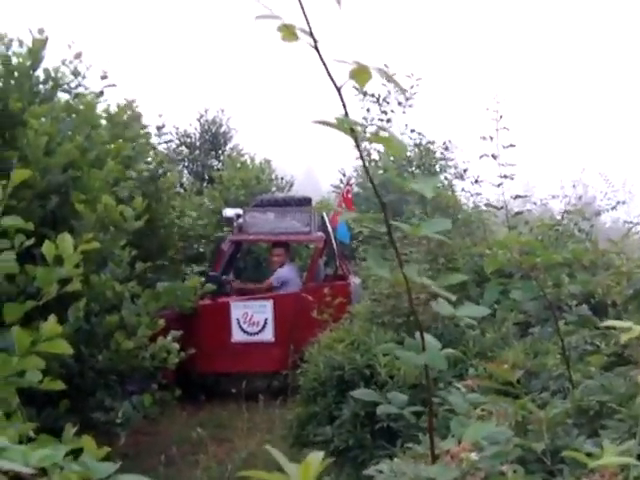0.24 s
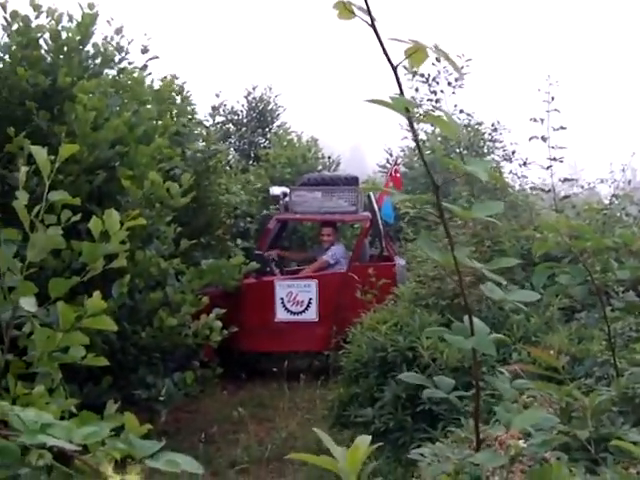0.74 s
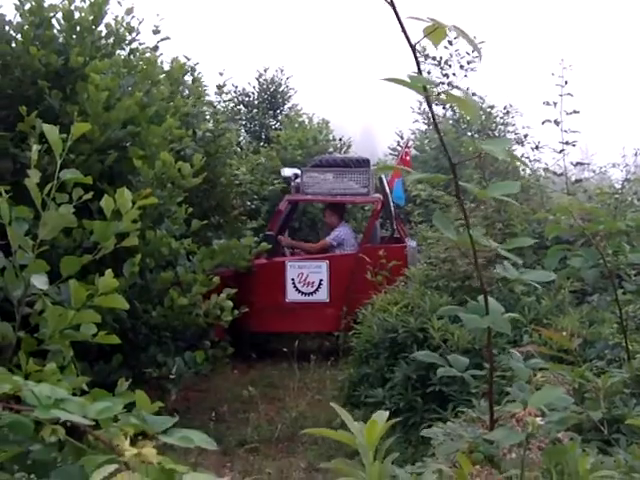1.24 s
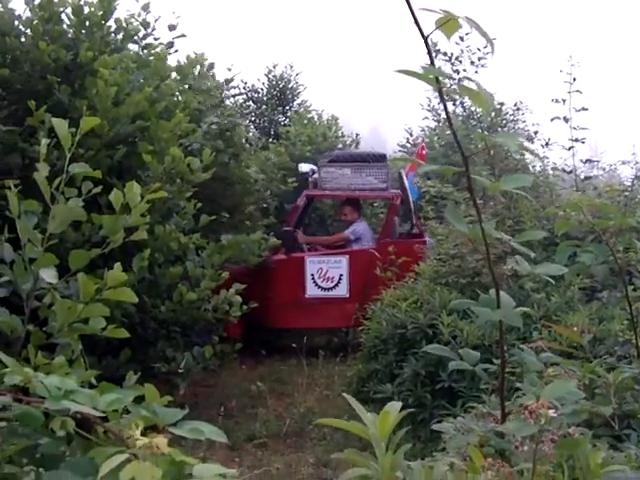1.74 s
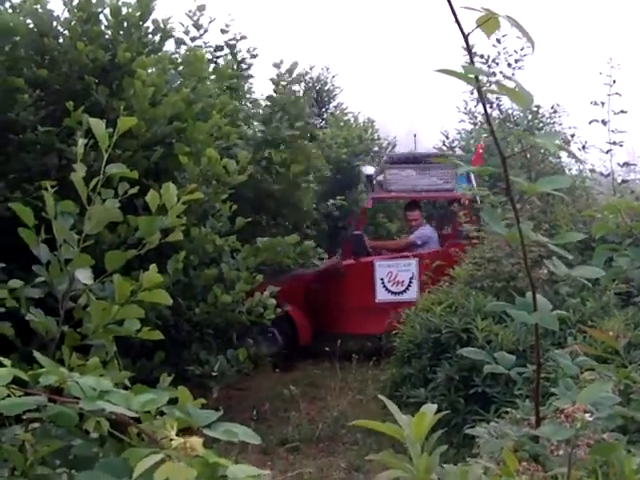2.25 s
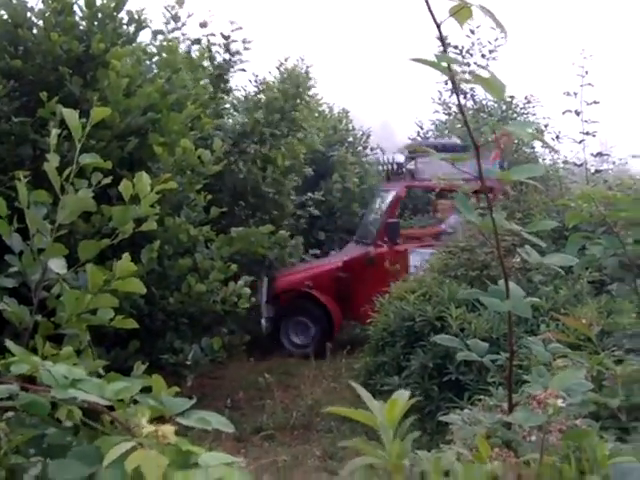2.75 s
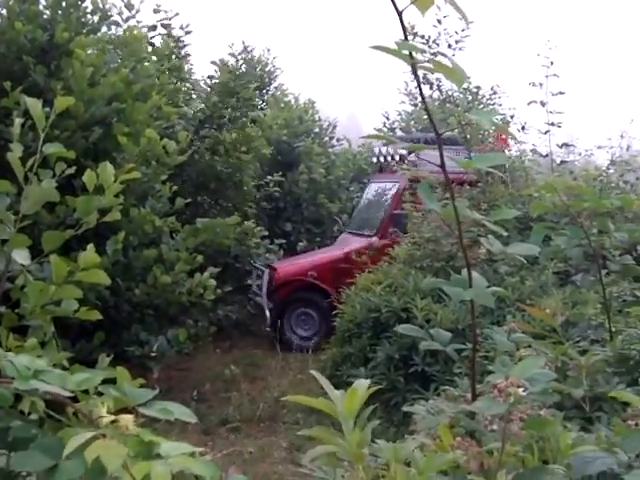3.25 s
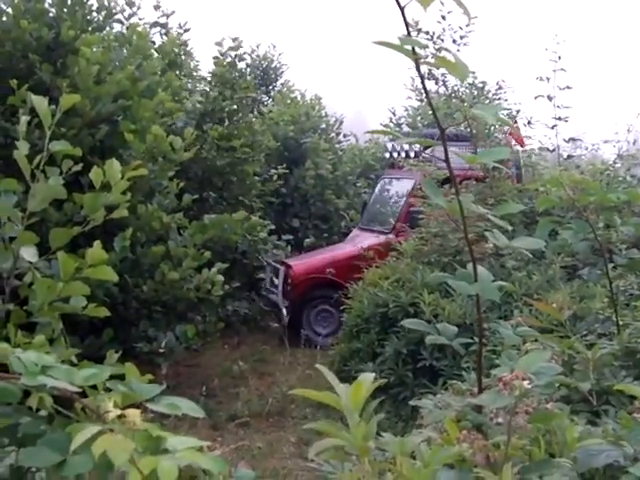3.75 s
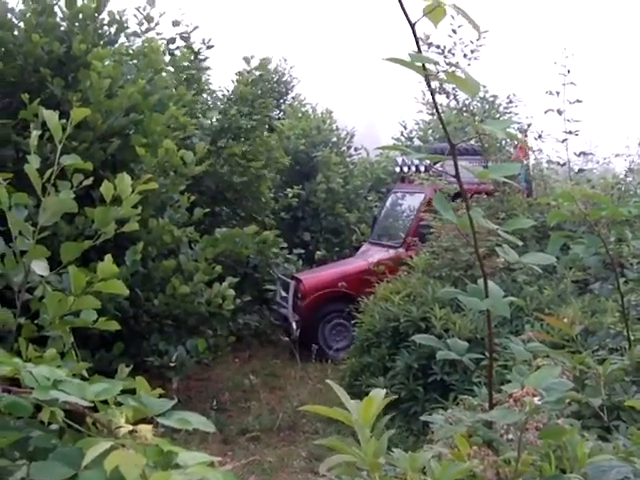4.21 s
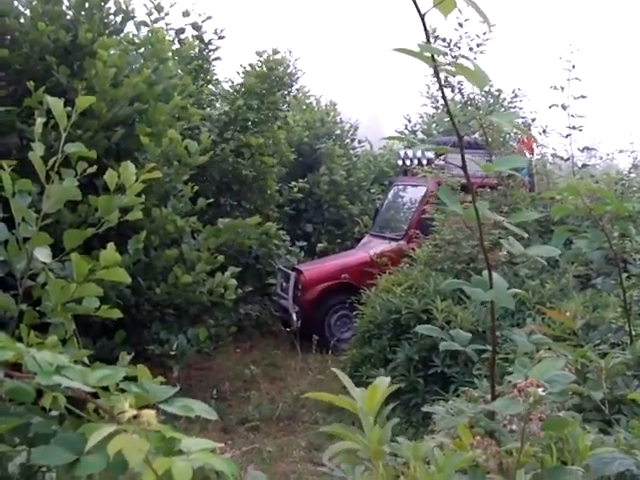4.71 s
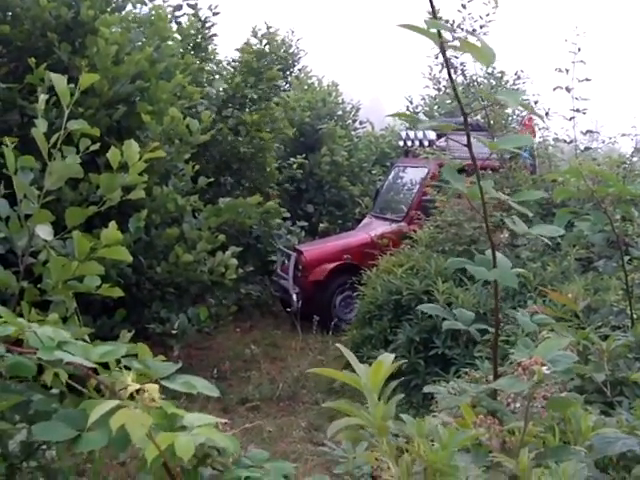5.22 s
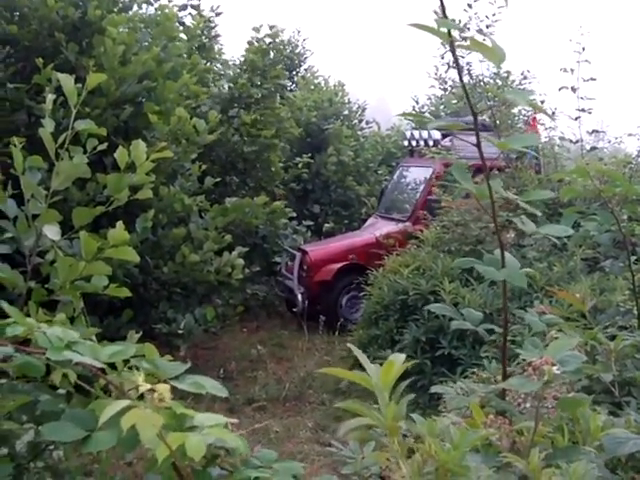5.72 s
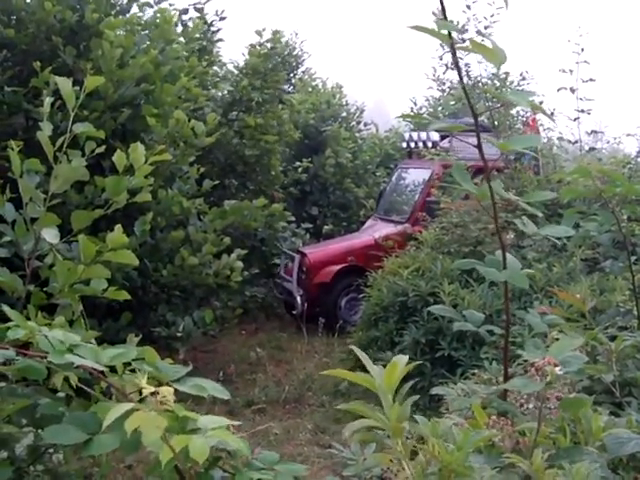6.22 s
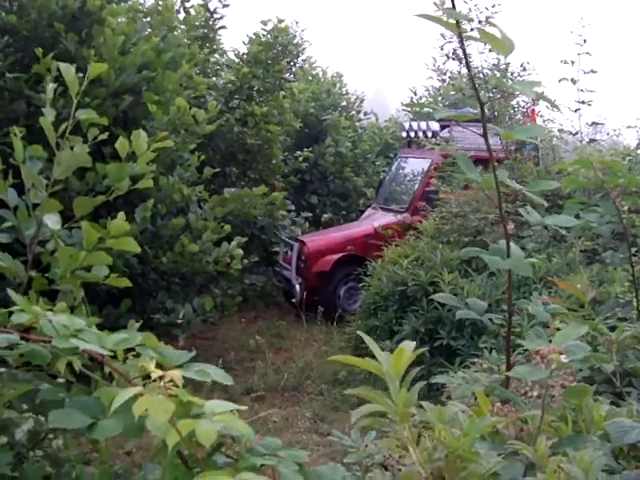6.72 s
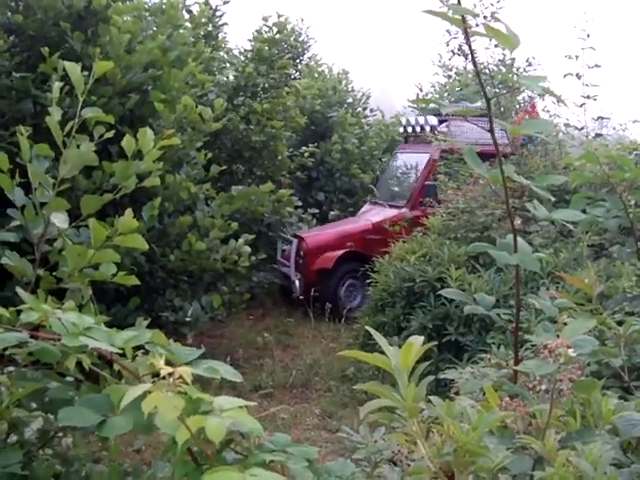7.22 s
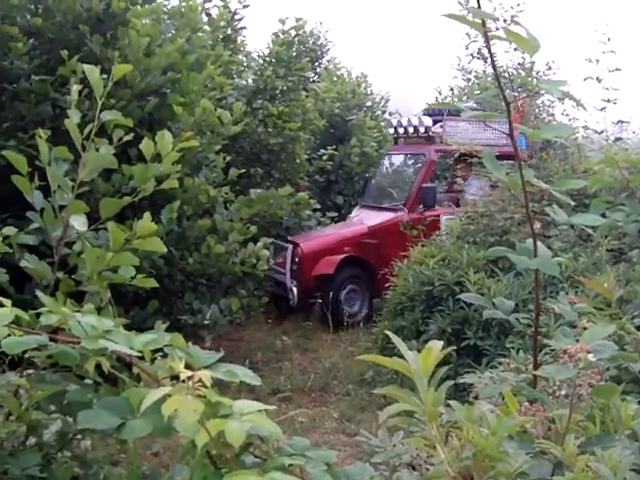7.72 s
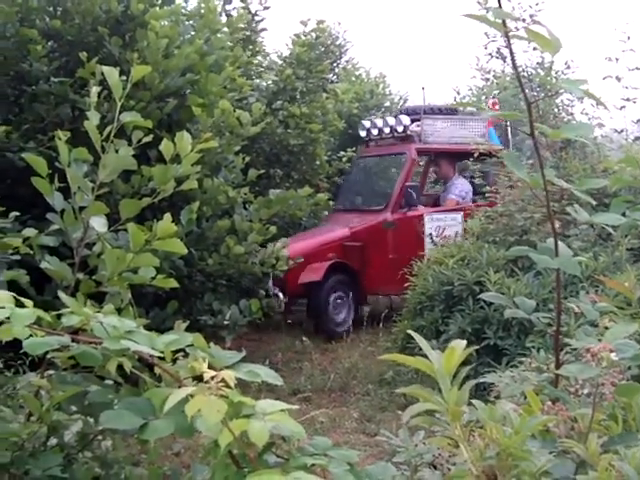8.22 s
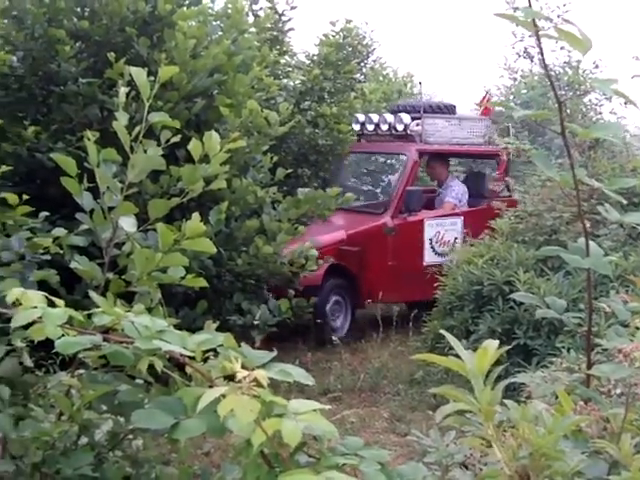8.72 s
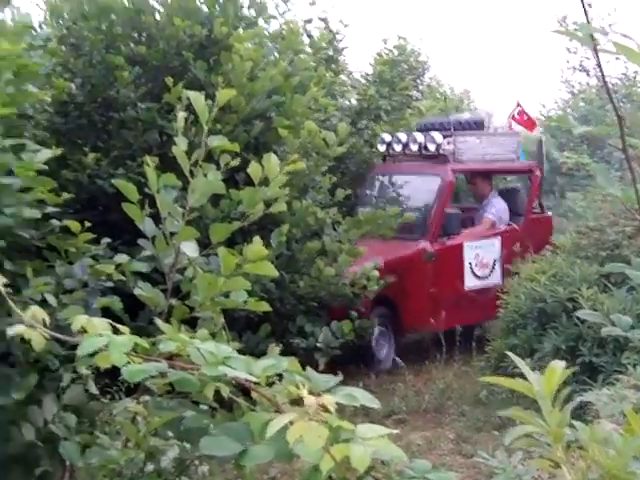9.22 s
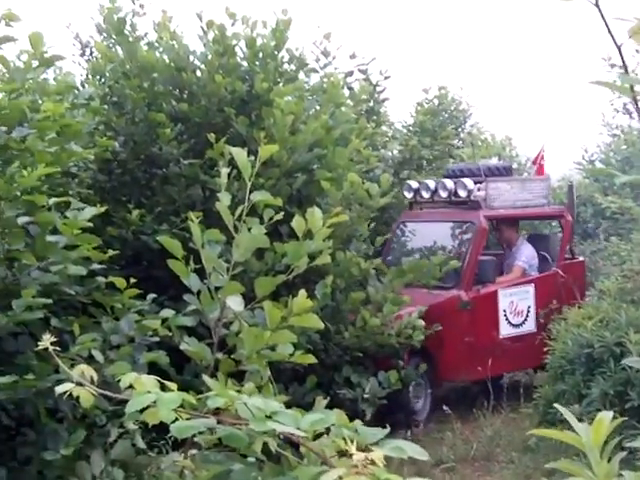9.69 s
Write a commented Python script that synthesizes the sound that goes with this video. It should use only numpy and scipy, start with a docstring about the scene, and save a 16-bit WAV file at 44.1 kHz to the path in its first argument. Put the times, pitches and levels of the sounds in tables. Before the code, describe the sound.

A small slow engine knocks and chuffs, revs hard in two bursts with a quiet idle between, as a car pushes through leafy brush.

```python
"""A small slow engine knocks and chuffs as it pushes a light car through dense brush, heard from a few metres.
Every cycle the cylinder knocks and, soon after, the exhaust spits a chuff of gas: soft and rounded at idle,
sudden and hissing under load. Knocks are short ringing tones and noise; chuffs are noise, shaped and resonated.
Valve gear clatters between (noise and clicks through the casing), leaves brush the body (coloured noise),
twigs snap (noise bursts), and loose parts ring when struck (dying tones)."""
import sys
import numpy as np
from scipy import signal
from scipy.fft import rfft, irfft, next_fast_len
from scipy.io import wavfile

SR = 44100
rng = np.random.default_rng(int(sys.argv[2]) if len(sys.argv) > 2 else 0)


def unload_audio(sound):
    """Save the sound as a 16-bit wav file, at the path given as the first command line argument."""
    columns = np.transpose(np.atleast_2d(sound))
    # keep every value between -1 and 1, then stretch to whole-number steps
    steps = np.round(np.clip(columns, -1, 1) * 32767)
    wavfile.write(sys.argv[1], SR, steps.astype(np.int16))


def boost(x):
    """Linear amplitude factor 10**(x/20) for a level x in decibels (scalar or array-like)."""
    u = np.asarray(x, float) / 20
    return 10 ** u


N = 438794

# The engine casing's resonances. Each row: pitch in Hz, width in Hz, level in dB.
CASING = [(1432, 150, 2), (1843, 220, -2), (2140, 300, -2), (2480, 520, -1.5), (3250, 330, -5),
          (4210, 1040, -9)]


def noise():
    """White noise."""
    return rng.standard_normal(N)


def rms_one(x):
    """Scale to unit rms."""
    return x / np.sqrt(np.mean(x ** 2) + 1e-20)


def grains(per_s, spread_db):
    """Random clicks of uneven size and sign; rms 1."""
    sizes = boost(spread_db * np.minimum(rng.exponential(1, N), 5))
    signs = rng.choice([-1, 1], N)
    return rms_one(sizes * signs * (rng.random(N) < per_s / SR))


def flicker(rate, depth_db):
    """Gain that wanders at random, with a new target rate times a second (19 at most)."""
    knots = rng.standard_normal(200)
    position = np.arange(N) * min(rate, 19) / SR
    return boost(depth_db * np.interp(position, np.arange(len(knots)), knots))


def dull(x, hz):
    """Take away the treble: second-order low-pass."""
    return signal.sosfilt(signal.butter(2, hz, fs=SR, output="sos"), x)


def coloured(x, spectrum):
    """Shape a steady sound by a spectrum of (Hz, dB) points; rms 1."""
    hz, db = np.transpose(spectrum)
    size = next_fast_len(N)
    log_hz = np.log(np.arange(size // 2 + 1) * SR / size + 1)
    gain = boost(np.interp(log_hz, np.log(hz), db))
    return rms_one(irfft(rfft(x, size) * gain, size)[:N])


def resonate(x, modes):
    """Parallel resonances of alternating sign, scaled to keep the power of white noise."""
    out, power = 0, 0
    for k, (hz, width, db) in enumerate(modes):
        r = np.exp(-np.pi * width / SR)
        top = (-1) ** k * boost(db) * (1 - r * r) / 2
        feedback = [1, -2 * r * np.cos(2 * np.pi * hz / SR), r * r]
        out = out + signal.lfilter([top, 0, -top], feedback, x + 1e-18)
        power += boost(2 * db) * np.pi * width / SR
    return out / np.sqrt(power)


def bursts(times, levels_db, rise_ms, hold_ms, fall_ms):
    """Envelope of bursts: exponential rise up to the given moment, a hold, an exponential fall."""
    margin = 2000  # samples kept ahead of the start, for the rise
    out, ms = np.zeros(N + 10000), np.arange(-margin, 6000) * 1000 / SR
    for s, db, rise, hold, fall in np.broadcast(times, levels_db, rise_ms, hold_ms, fall_ms):
        rising = np.minimum(ms, 0) / max(rise, .2)
        falling = np.maximum(ms - hold, 0) / max(fall, 1)
        at = round(s * SR)
        # overlapping bursts add as power
        out[at:at + len(ms)] += (boost(db) * np.exp(rising - falling)) ** 2
    return np.sqrt(out[margin:N + margin])


def ring(times, levels_db, hz, t60):
    """Clicks set one sine ringing, which dies by 60 dB in t60 seconds."""
    clicks = np.zeros(N)
    clicks[np.minimum(np.round(np.multiply(times, SR)).astype(int), N - 1)] = boost(levels_db)
    r, w = boost(-60 / (t60 * SR)), 2 * np.pi * hz / SR
    return signal.lfilter([0, np.sin(w)], [1, -2 * r * np.cos(w), r * r], clicks + 1e-18)


def strokes():
    """The crank plays a light stroke every cycle; full firings replace strokes, hard knocks only their knocks."""
    # Engine speed. Each row: time in seconds, working cycles per minute.
    speed = [(0.0, 564.4), (0.583, 499.9), (1.022, 676.2), (1.427, 808.6), (2.237, 543.2), (2.536, 648.9),
             (3.455, 515.3), (3.792, 526.4), (3.981, 478.5), (4.864, 468.8), (6.213, 479.3), (6.508, 452.4),
             (6.918, 695.0), (7.306, 631.7), (8.359, 699.2), (8.709, 603.5), (9.094, 635.7), (9.95, 505.1)]
    # Typical light strokes over time. Each row: time in seconds, jet level in dB, pipe level in dB,
    # rise of the jet in ms, knock level in dB.
    light = [(0.0, -28, -19.5, 3, -28.5), (0.5, -27.5, -22, 4.9, -28), (1.6, -26, -19.5, 5.5, -27),
             (2.6, -28.5, -20, 6.3, -31), (3.2, -27.5, -21, 4.3, -37), (3.6, -31.5, -23, 13, -29),
             (3.95, -31, -19.5, 5.8, -33), (4.9, -33, -21, 6.8, -30.5), (5.3, -30.5, -20.5, 7.5, -29),
             (6.5, -32.5, -22.5, 5.5, -31.5), (7.9, -26, -18, 9.6, -19.5), (8.25, -26.5, -25.5, 26, -31),
             (8.42, -25, -19, 2.5, -24.5), (8.9, -27, -19.5, 12.4, -33), (9.25, -25, -19, 5.3, -31),
             (9.95, -26.5, -18, 5.4, -40)]
    # Full firings. Each row: knock in seconds, knock level in dB, ms until the exhaust crest,
    # jet level in dB, pipe level in dB.
    firings = [(0.7348, -10.5, 26.7, -15, -19), (0.8373, -16, 24.2, -15, -19),
               (1.0222, -14.5, 22.6, -14.5, -17.5), (1.1944, -10.5, 21.2, -14.5, -23),
               (1.276, -12, 19.2, -16.0, -21), (1.3535, -12.5, 18.7, -18.0, -18.5),
               (1.4306, -11.0, 19.6, -15.0, -19.0), (1.5061, -13.5, 17.5, -16, -17),
               (1.744, -13.5, 21.5, -21.5, -17.5), (1.8333, -13, 22.2, -19.5, -17),
               (1.9223, -15.5, 22, -24.0, -19.5), (2.0201, -14, 23.3, -18.5, -17),
               (2.1164, -20, 29.5, -28, -18.5), (2.2245, -15.0, 26.3, -16.5, -14.5),
               (2.3292, -18.5, 27.2, -16, -16), (2.4335, -17, 24.2, -17.0, -16.5),
               (6.5811, -18.0, 29.4, -19.5, -16.0), (6.691, -21.5, 25, -20.5, -16),
               (6.792, -21, 24.8, -18.5, -14), (6.887, -21, 21, -19, -15), (6.9764, -21, 20, -18, -14),
               (7.1548, -14, 22, -18, -16), (7.3411, -15, 23.5, -16, -16.5),
               (7.435, -20.5, 23.3, -19.5, -16.5), (7.5276, -23.5, 26.4, -31, -20.5),
               (7.6254, -19.5, 24.2, -17.5, -15.5), (7.7188, -20, 23.4, -18.5, -19),
               (7.81, -20.5, 22, -19.5, -19.5)]
    # Hard knocks. Each row: time in seconds, level in dB.
    hard_knocks = [(1.0941, -23), (2.529, -19.5), (8.71, -14.5), (8.8906, -21.5), (8.988, -20),
                   (9.085, -17.5), (9.921, -20.5)]

    t = np.arange(N + SR // 10) / SR
    turn = np.interp(t, *np.transpose(speed)) / 60  # cycles per second
    # the exhaust crests at whole cycles; the sound starts at cycle -0.9315
    crest = np.interp(np.arange(96), -0.9315 + np.cumsum(turn) / SR, t)
    # a light stroke knocks 0.43 cycles before its exhaust crest
    knock_s = crest - 0.43 / np.interp(crest, t, turn)
    s, *controls = np.transpose(light)
    jet_db, pipe_db, rise, knock_db = [np.interp(crest, s, c) for c in controls]

    # no two light strokes are alike
    chance = rng.standard_normal((len(crest), 8)).T
    hold, fall = np.full_like(rise, 3.4), np.full_like(rise, 10.4)  # typical, ms
    thump_db, rattle_db = np.full_like(rise, -11.5), np.full_like(rise, -8.5)  # re the knock
    shapes = np.exp(0.23 * chance[2:5]) * [rise, hold, fall]
    chuffs = np.array([crest, jet_db + 0.74 * chance[0], pipe_db + 0.74 * chance[1], *shapes])
    knocks = np.array([knock_s, *(1.9 * chance[5:] + [knock_db, thump_db, rattle_db])])

    for s, db in hard_knocks:
        knocks[:, np.argmin(np.abs(knock_s - s))] = s, db, -16, -5.5
    for s, db, opens, jet, pipe in firings:
        k = np.argmin(np.abs(knock_s - s))
        weaker, softer = -15 - jet, -15 - db  # dB below a jet and a knock of -15 dB
        # the body loses less than the knock does
        knocks[:, k] = s, db, -13 + 0.42 * softer, -6.5 + 0.42 * softer
        # a weaker jet holds longer and falls faster
        chuffs[:, k] = s + opens / 1000, jet, pipe, 0.93, 9.9 + 0.55 * weaker, 14 - 0.14 * weaker
    return chuffs[:, :-1], knocks


def cylinder(knocks):
    """The pressure jump cracks a few short modes and bounces, shakes the casing and thumps the block."""
    # Ringing of the knock. Each row: pitch in Hz, level in dB, seconds to die by 60 dB.
    crack_modes = [(1535, -1, 0.024), (2080, -20, 0.036), (2900, -24, 0.039)]
    # The knock repeats. Each row: delay in seconds, typical level in dB.
    bounces = [(0.0104, -11), (.021, -11)]
    # Engine block resonances. Each row: pitch in Hz, width in Hz, level in dB.
    block = [(535, 190, -4), (904, 163, -1)]

    s, db, thump_db, rattle_db = knocks
    crack, uneven = 0, rng.normal(0, 1.6, (len(s), len(bounces)))
    for hz, mode_db, t60 in crack_modes:
        crack += ring(s, db + 1.0 + mode_db, hz, t60)
        for k, (delay, bounce_db) in enumerate(bounces):
            crack += ring(s + delay, db + mode_db + bounce_db + uneven[:, k], hz, t60)
    shudder = resonate(bursts(s, db - 13, .4, 4.0, 14) * noise(), [(1480, 330, 0)])
    rattle = resonate(bursts(s, db + rattle_db - 2.5, 0.21, 8.1, 10.6) * noise(), CASING)
    thump = resonate(bursts(s + 0.0025, db + thump_db - 1.5, 1.5, 6.4, 17.2) * noise(), block)
    return dull(crack + shudder + rattle + thump, 8100)


def whistles():
    """Narrow outlet resonances, each coming and going on its own; rms 1."""
    # Exhaust outlet resonances. Each row: pitch in Hz, width in Hz, typical level in dB.
    outlet = [(4220, 230, -14), (5640, 230, 1), (6270, 130, -1), (8670, 130, 5), (9850, 210, -3.5),
              (10440, 120, -1), (12900, 150, -17)]
    out = 0
    for hz, width, db in outlet:
        out = out + boost(db) * flicker(18, 5.8) * resonate(noise(), [(hz, width, 0)])
    return rms_one(out)


def exhaust(chuffs):
    """Turbulent gas hisses at the outlet and rings the pipe; strong chuffs are wide jets, weak ones other puffs."""
    # Spectrum of the strong jet. Each row: pitch in Hz, level in dB.
    jet_spectrum = [(1200, -14), (2500, -2.5), (4500, -0.5), (5300, -3.5), (6300, -4.5), (7300, -2),
                    (8500, -7), (9200, -1), (10100, -3.5), (12300, -8), (14800, -17), (15500, -19)]
    # Spectrum of the weak puff. Each row: pitch in Hz, level in dB.
    puff_spectrum = [(2500, -3), (4500, 0.5), (6000, 2.5), (7300, -4), (8800, 1), (9700, -0.5), (10500, 0),
                     (12000, -5), (13500, -15), (15500, -24)]
    # Lower pipe resonances. Each row: pitch in Hz, width in Hz, level in dB.
    pipe_low = [(1868, 63, -0.5), (2080, 107, -1), (2545, 226, 2), (2954, 257, -1.5)]
    # Upper pipe resonances. Each row: pitch in Hz, width in Hz, level in dB.
    pipe_high = [(3120, 125, 4.5), (3576, 265, 1), (4200, 780, -6)]

    s, jet_db, pipe_db, rise, hold, fall = chuffs
    force = np.clip((jet_db + 28.0) / 11, .01, .99)  # near 0 all puff, near 1 all jet
    jet_hiss = coloured(noise(), jet_spectrum) + 0.23 * whistles()
    jet = bursts(s, jet_db + 10 * np.log10(force), rise, hold, fall) * jet_hiss
    # the first rush of gas whistles in the outlet
    jet += bursts(s, jet_db + 20 * np.log10(force) - 3.5, rise, 2.3, 3.2) * whistles()
    puff_hiss = coloured(noise(), puff_spectrum) + 0.12 * whistles()
    puff = bursts(s, jet_db + 10 * np.log10(1 - force), rise, hold, fall) * puff_hiss
    rough_gas = rms_one(noise() + 0.9 * grains(2500, 3.6))
    drive = bursts(s, pipe_db, 1.29 * rise + 1.1, hold, 1.26 * fall) * rough_gas
    pipe = 0.71 * resonate(drive, pipe_low) + 0.57 * flicker(4.0, 1.4) * resonate(drive, pipe_high)
    return (jet + puff + dull(pipe, 10000)) * np.sqrt(.5)


def twigs():
    """Twigs and ticks on the body: short broad cracks of noise, partly ringing the casing resonances."""
    # Each row: time in seconds, level in dB.
    snaps = [(2.6014, -18), (2.7244, -39), (3.3373, -32), (3.4724, -32), (3.5814, -32), (4.398, -30),
             (6.317, -27), (6.335, -18), (9.0139, -31), (9.1097, -30), (9.207, -33), (9.7922, -21),
             (9.837, -24)]
    s, db = np.transpose(snaps)
    crack = bursts(s, db - 1, 0.34, 1.4, 6.4) * noise()
    return resonate(crack, CASING) + 0.6 * dull(crack, 8400)


def panels():
    """A loose bracket is tapped and branches slap a panel; each blow strikes every mode unevenly."""
    # Taps on the bracket. Each row: time in seconds, level in dB.
    bracket_taps = [(3.245, -34.5), (3.335, -34), (3.51, -29.5), (3.582, -32), (8.575, -28), (9.215, -31)]
    # The bracket's ringing. Each row: pitch in Hz, level in dB, seconds to die by 60 dB.
    bracket = [(4250, 0, 0.11), (4380, -4, 0.05)]
    # Slaps on the panel. Each row: time in seconds, level in dB.
    panel_slaps = [(4.625, -38), (7.985, -32), (8.095, -38), (8.12, -26), (8.164, -28), (8.24, -31),
                   (8.278, -33), (9.791, -34)]
    # The panel's ringing. Each row: pitch in Hz, level in dB, seconds to die by 60 dB.
    panel = [(2430, 0, 0.088), (2490, -13, 0.04), (2870, 4.5, 0.095), (3100, -6, 0.04), (3280, -5, 0.088),
             (3280, -7, 0.05)]

    out = 0
    for blows, modes, spread_db in ((bracket_taps, bracket, 2.5), (panel_slaps, panel, 4.0)):
        s, db = np.transpose(blows)
        uneven = rng.normal(0, spread_db, (len(s), len(modes)))
        for k, (hz, mode_db, t60) in enumerate(modes):
            out = out + ring(s, db + mode_db + uneven[:, k], hz, t60)
    return out


def frame():
    """The frame flexes: a low tone that starts sharp, sags into its pitch, holds and dies."""
    # Each row: time in seconds, level in dB, settled pitch in Hz, hold in ms.
    groans = [(8.401, -37.5, 526, 20), (8.725, -36.5, 511.5, 58)]
    t, out = np.arange(N) / SR, 0
    for s, db, hz, hold in groans:
        sagging = hz * (1 + 0.18 * np.exp(-np.abs(t - s) / 0.0126))
        tone = np.sin(2 * np.pi * np.cumsum(sagging) / SR)
        out = out + bursts([s], db, 3.3, hold, 30) * tone
    return out


def foliage(x):
    """Leaves and trunks scatter the sound back as a short dense tail."""
    t = np.arange(round(.4 * SR)) / SR
    fade = boost(-60 * t / 0.28)  # down 60 dB in 0.28 s
    tail = rng.standard_normal(len(t)) * fade * (t > .004)
    return signal.fftconvolve(dull(x, 11700), tail / np.sqrt(np.sum(tail ** 2)))[:N]


def curves():
    """Gains over time of the running noises; the boom follows the rumble and wanders."""
    # Between the chuffs. Each row: time in seconds, clatter in dB, rumble in dB, leaf rustle in dB.
    running_levels = [(0.0, -33.5, -49, -39.5), (0.3, -40, -50, -44.5), (0.69, -33, -44.5, -42.5),
                      (1.08, -35.5, -45, -42), (1.5, -29, -36.5, -36), (1.77, -33.5, -41, -37.5),
                      (2.08, -31.5, -39.5, -42.5), (2.44, -32.5, -39, -36), (2.83, -36.5, -47.5, -45),
                      (3.52, -39, -47.5, -48), (4.02, -38, -46.5, -52), (5.76, -37.5, -47, -49.5),
                      (6.4, -37, -47, -49), (6.79, -37, -42, -43.5), (7.84, -32, -41, -41.5),
                      (8.09, -31, -45, -33.5), (8.37, -34.5, -43.5, -43), (8.62, -30.5, -42.5, -33),
                      (8.87, -36.5, -44.5, -44.5), (9.17, -35.5, -47, -35.5), (9.59, -37.5, -50, -45),
                      (9.95, -35.5, -41.5, -43)]
    s, *levels = np.transpose(running_levels)
    clatter, rumble, rustle = [boost(np.interp(np.arange(N) / SR, s, db)) for db in levels]
    boom = boost(-9.5) * rumble * flicker(3.04, 1.3)
    return boom, rumble, clatter, rustle


def running(knock_s, boom, rumble, clatter, rustle):
    """Low boom and rumble of the body, valve gear ticking into the casing, leaves dragged along the panels."""
    # Body boom. Each row: pitch in Hz, width in Hz, level in dB.
    boom_modes = [(185, 57, 1.5), (276, 80, -0.5)]
    # Rumbling hollows of the body. Each row: pitch in Hz, width in Hz, level in dB.
    hollows = [(425, 132, -4), (627, 127, 0.5), (865, 61, -2)]
    # Spectrum of the leaves. Each row: pitch in Hz, level in dB.
    leaf_spectrum = [(1500, -7), (3500, 0), (5000, 0.5), (6200, -3.5), (8500, -8.5), (10700, -10.5),
                     (13000, -16.5), (15500, -23)]

    gear = 0
    # every casing mode is tapped by its own parts
    for hz, width, db in CASING:
        taps = noise() + 0.98 * grains(300, 2.94)
        gear = gear + boost(db) * np.sqrt(width) * flicker(15, 2.25) * resonate(taps, [(hz, width, 0)])
    # the clatter swells at each knock and sinks afterwards
    cycle = 0.6 + bursts(knock_s, -9.5, 1.0, 73, 37)
    valve_gear = cycle * clatter * rms_one(dull(gear, 7700))
    leaves = coloured(noise() + .5 * grains(2000, 4.2), leaf_spectrum) * flicker(14, 2.6)
    low = boom * resonate(noise(), boom_modes) + rumble * resonate(noise(), hollows)
    # steady low hum of the place
    far = boost(-64) * resonate(noise(), [(101, 145, 0)])
    return low + far + valve_gear + rustle * leaves


def scene():
    """Blows with their scattered tail over the running noise; small parts radiate little bass."""
    chuffs, knocks = strokes()
    blows = exhaust(chuffs) + cylinder(knocks) + twigs() + panels() + frame()
    blows = signal.sosfilt(signal.butter(2, 330, "high", fs=SR, output="sos"), blows)
    mix = blows + boost(-12) * foliage(blows) + running(knocks[0], *curves())
    return mix[None]


def top_cut(x):
    """Nothing passes above the cut-off."""
    return signal.sosfilt(signal.butter(12, 16460, fs=SR, output="sos"), x)


def record(dry):
    """A thin microphone with narrow notches, little bass and a cut top."""
    # Each row: pitch in Hz, width in Hz.
    notches = [(1000, 320), (7845, 300), (7845, 260)]
    x = signal.sosfilt(signal.butter(3, 110, "high", fs=SR, output="sos"), dry)
    for hz, width in notches:
        x = signal.lfilter(*signal.iirnotch(hz, hz / width, SR), x)
    x = signal.sosfilt(signal.ellip(10, .5, 60, 15300, fs=SR, output="sos"), x)
    return top_cut(x)


dry = scene()
out = record(dry)
unload_audio(out)
```